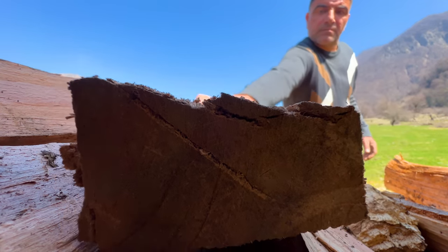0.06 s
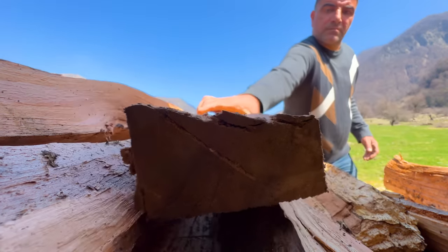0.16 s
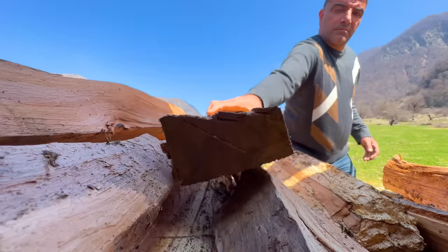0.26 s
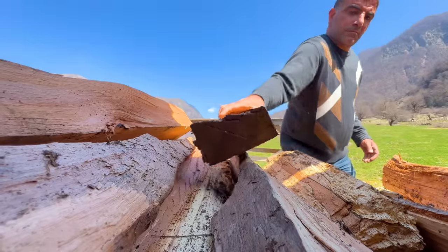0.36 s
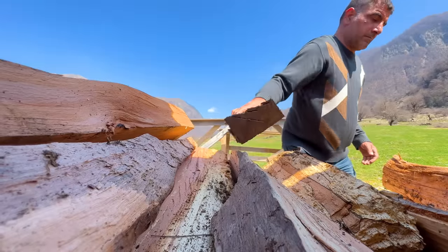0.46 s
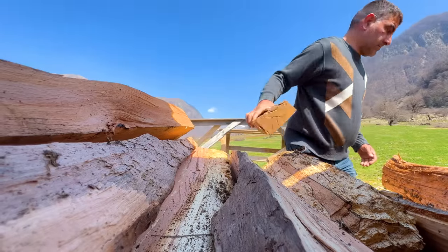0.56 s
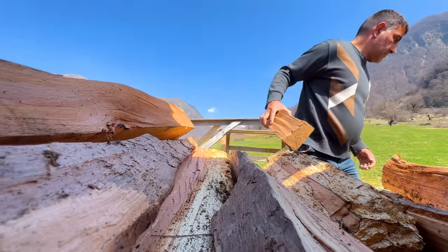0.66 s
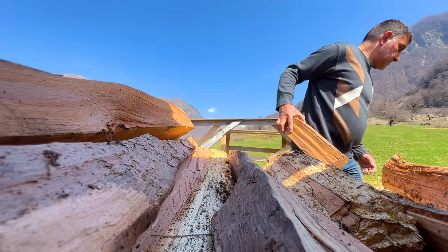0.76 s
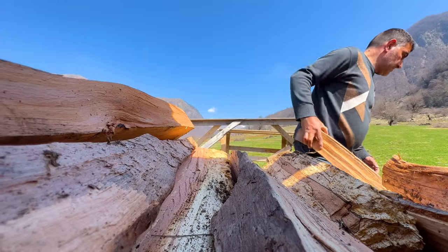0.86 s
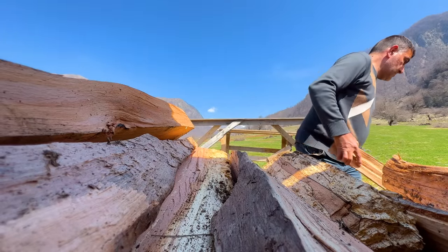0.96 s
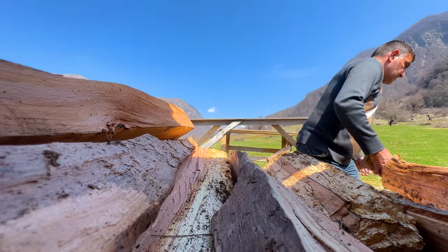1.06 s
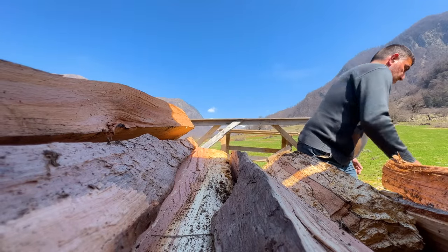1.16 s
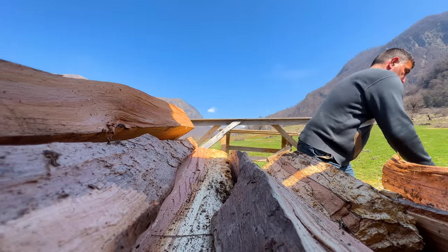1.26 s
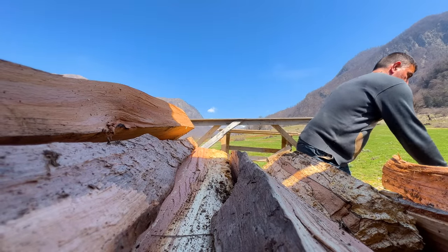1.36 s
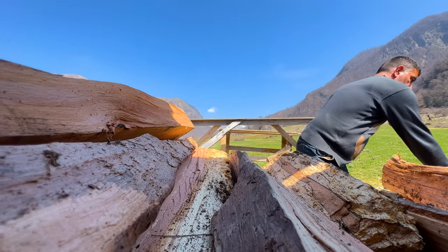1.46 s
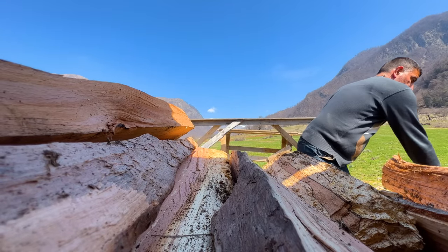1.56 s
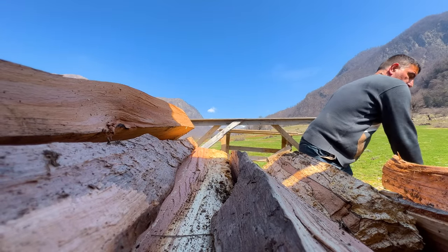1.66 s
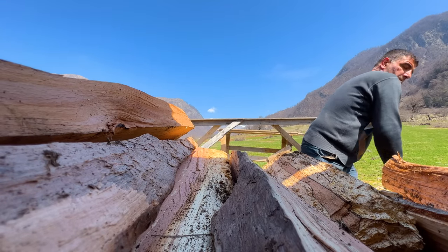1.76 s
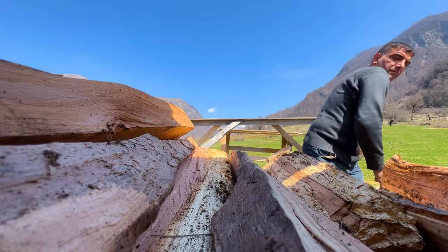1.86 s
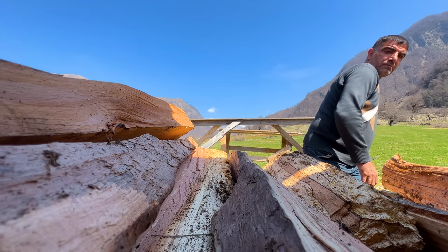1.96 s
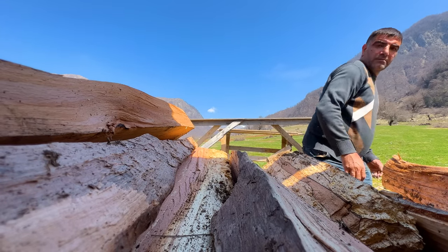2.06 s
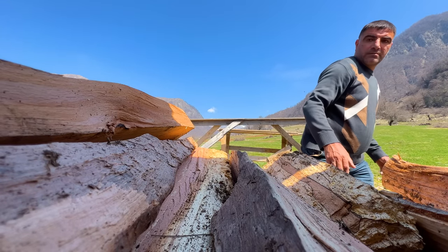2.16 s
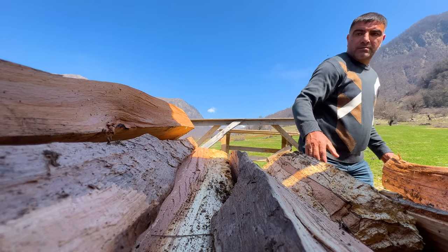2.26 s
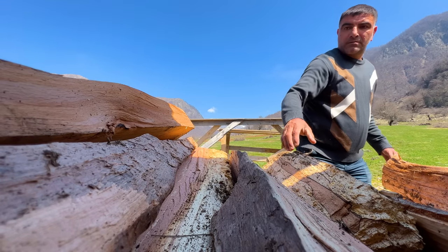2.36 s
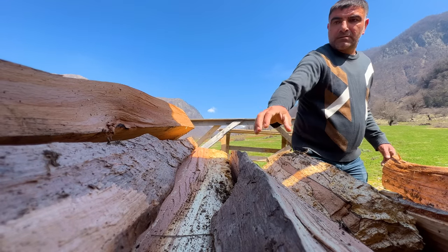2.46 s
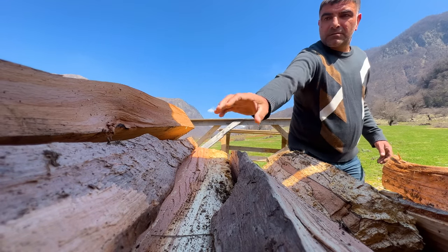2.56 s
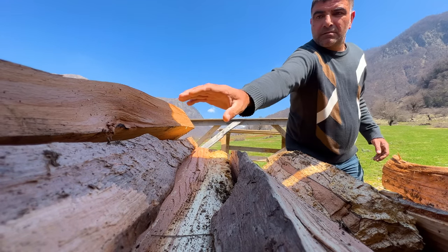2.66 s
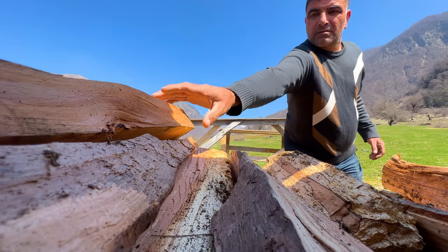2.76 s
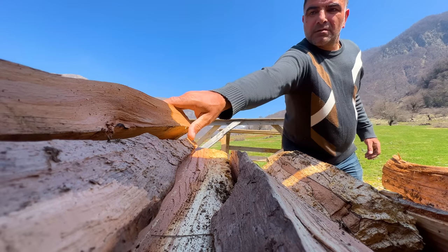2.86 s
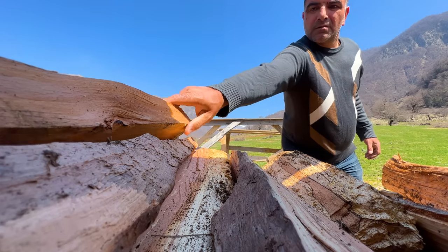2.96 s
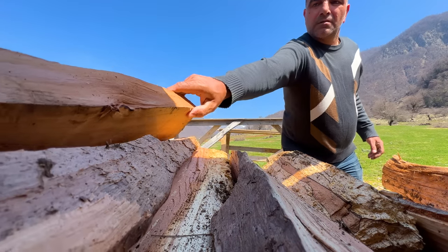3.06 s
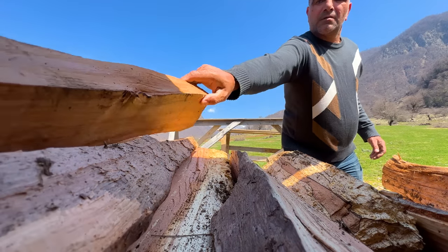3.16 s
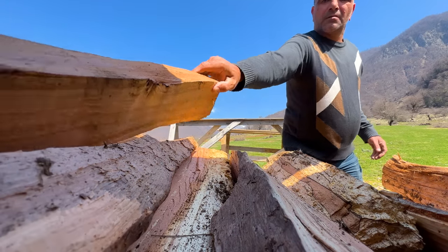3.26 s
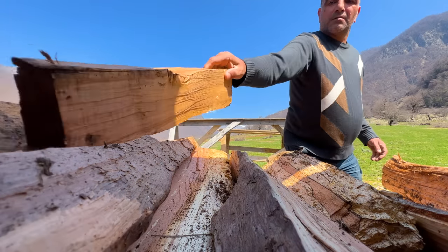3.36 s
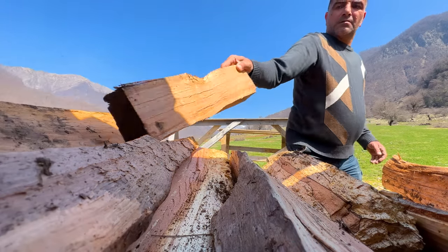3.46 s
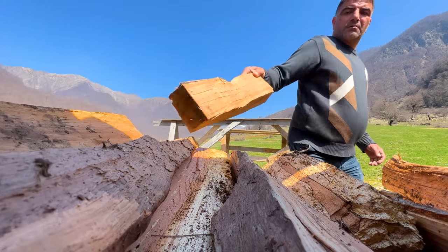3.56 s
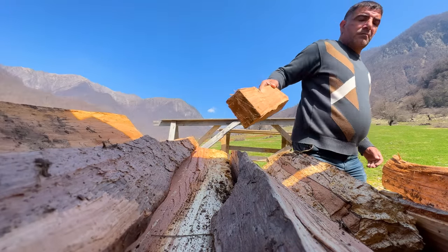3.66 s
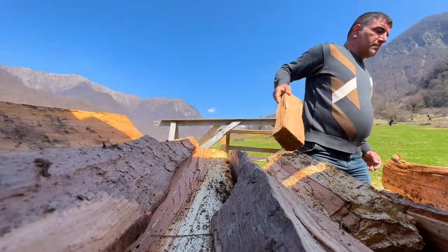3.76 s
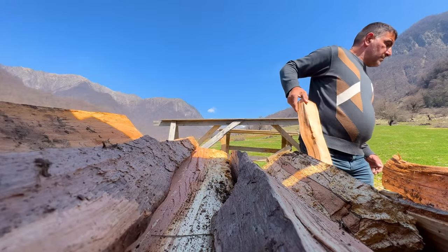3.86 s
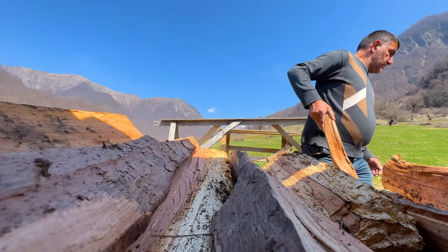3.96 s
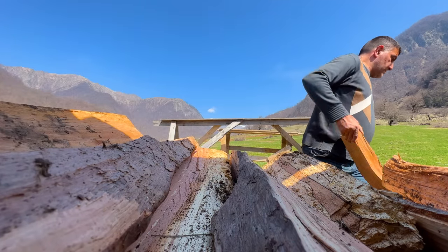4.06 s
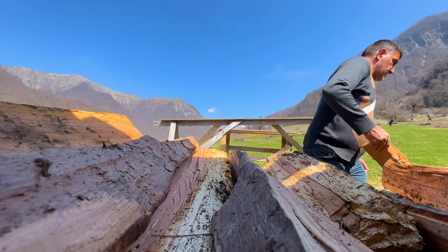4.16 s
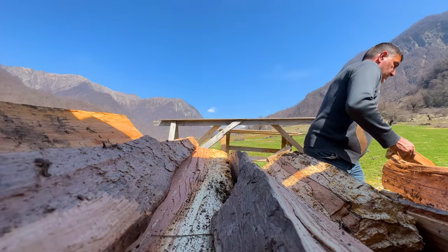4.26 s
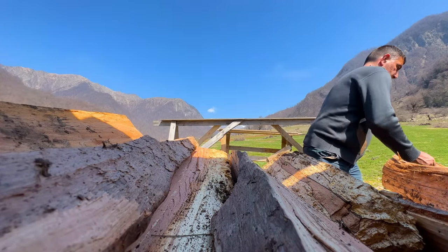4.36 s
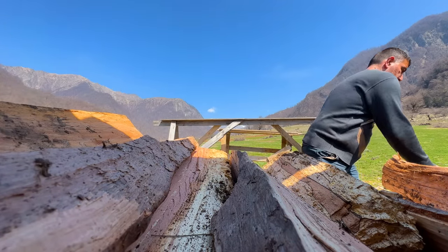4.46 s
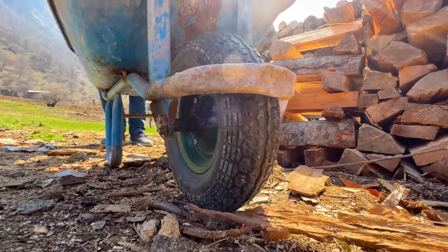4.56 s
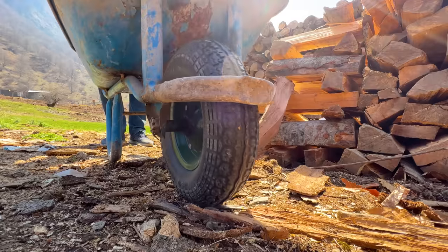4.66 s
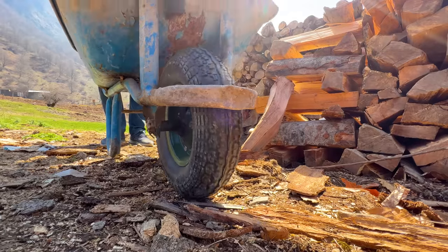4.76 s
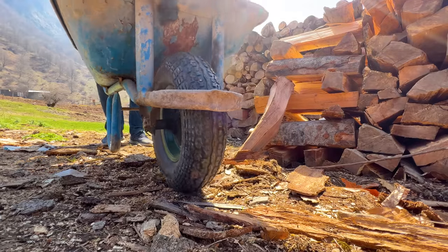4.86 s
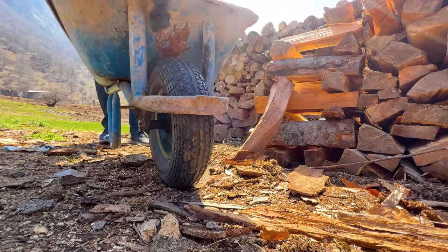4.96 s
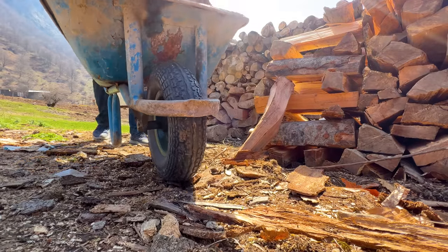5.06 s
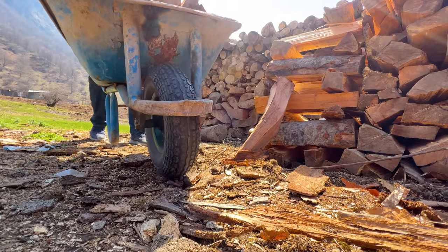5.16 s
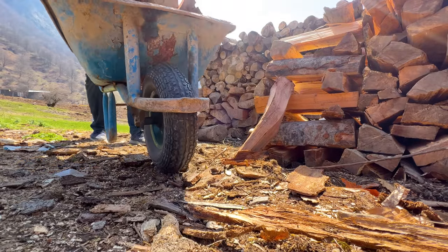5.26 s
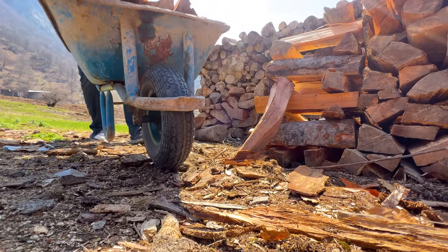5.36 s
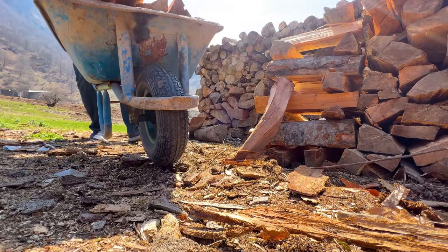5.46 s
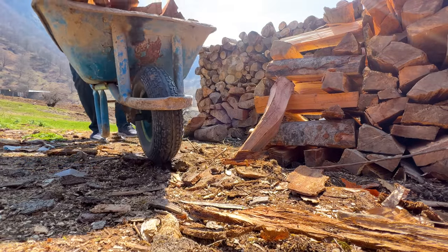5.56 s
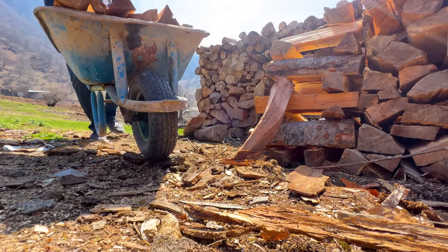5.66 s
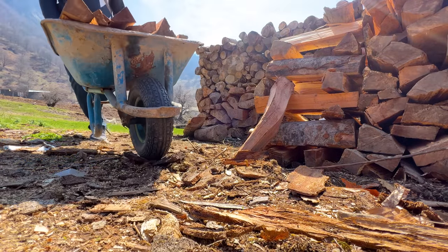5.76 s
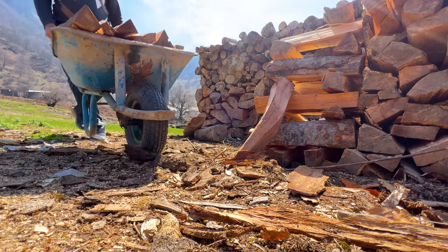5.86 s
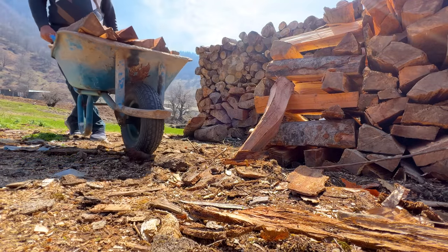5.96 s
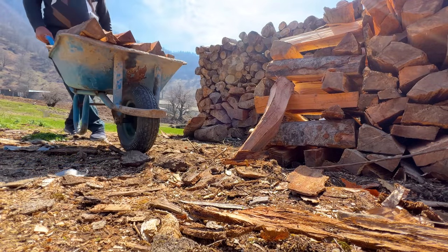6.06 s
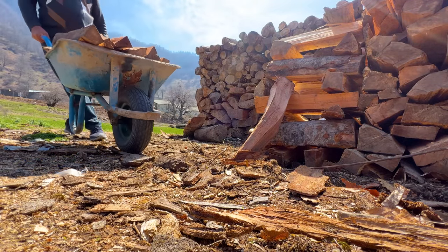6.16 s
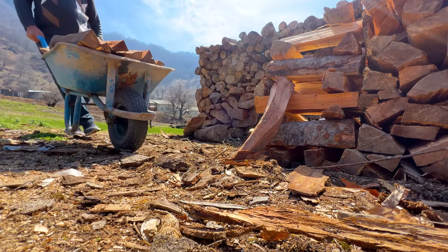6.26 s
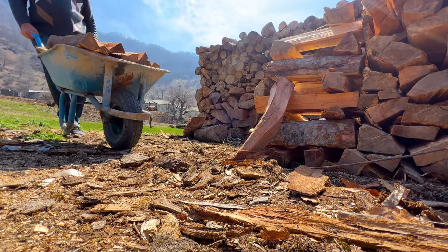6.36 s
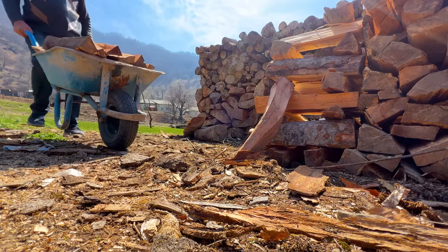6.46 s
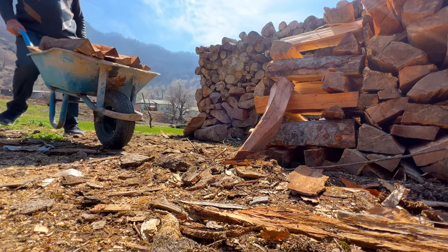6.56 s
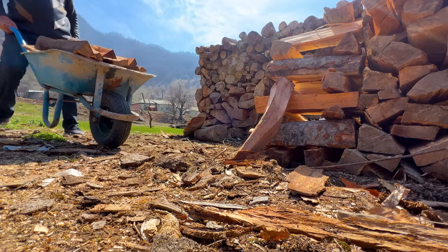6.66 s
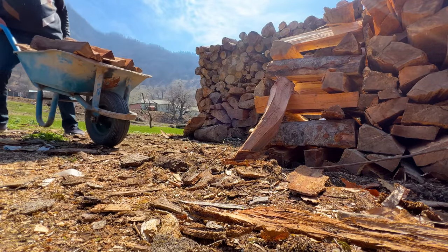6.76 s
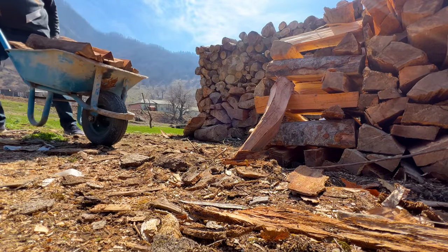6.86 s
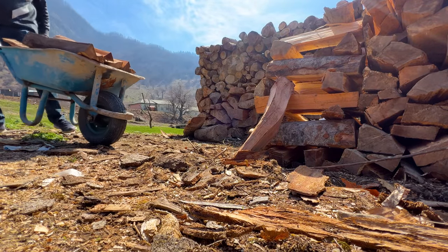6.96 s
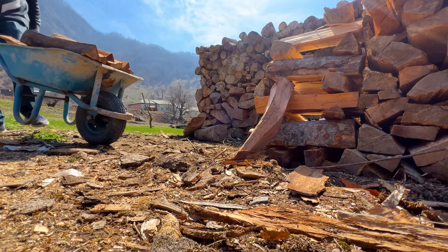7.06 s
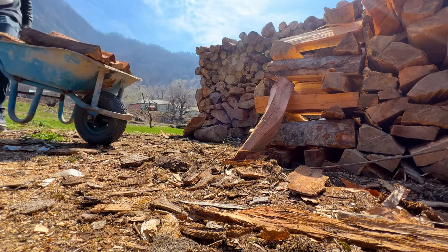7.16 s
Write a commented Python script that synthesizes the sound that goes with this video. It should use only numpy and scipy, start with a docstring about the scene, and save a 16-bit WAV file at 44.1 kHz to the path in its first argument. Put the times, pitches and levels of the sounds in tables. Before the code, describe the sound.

Close and dry outdoors, with very soft, low air noise throughout. From 0 to 0.4 s a split log is dragged off a loaded wheelbarrow: a brief resonant scrape, dull wood knocks, a bright clack and a low wobble of the tray on its tyre. Near-quiet follows, with a faint knock around 1.3 s. At 1.6 s the log lands on a woodpile with a loud hollow thump, a clonk and fast bounces dying by 1.8 s. Quiet again until 2.8 s, when a longer log grates and clacks until 3.55 s, hardest at 3.0 and 3.5 s, with low rocking. It thumps down at 4.62 s, bouncing briefly. From about 4.9 s the barrow rolls away over bark chips: hiss, snaps, low jolts and load knocks, strong at 5.4 s, with a sharp crunch at 5.75 s. Smaller crackles and soft rumbles recede to about 7.2 s as a faint distant watery rush rises.

```python
"""Split logs are dragged out of a steel wheelbarrow and land on a wood stack outdoors, with hollow thumps and bounces.
Sliding is rough noise that rings each log's resonances; blows and wood knocks are decaying tones with noise bursts.
The loaded tray rocks on its tyre as low tones. Then the barrow is pulled away over bark chips, its load knocking:
hiss, crunches and snaps are shaped noise, and the frame rumbles after bumps.
Low air noise, also shaped noise, lies under all; a far stream-like rush comes up in the later part."""
import sys
import numpy as np
from scipy import signal
from scipy.fft import rfft, irfft, next_fast_len
from scipy.io import wavfile
from scipy.ndimage import uniform_filter1d, map_coordinates

SR = 44100
rng = np.random.default_rng(int(sys.argv[2]) if len(sys.argv) > 2 else 0)


def dump(signal):
    """Clip the signal to [-1, 1] and save it as 16-bit WAV at the path in sys.argv[1]."""
    limited = np.clip(np.atleast_2d(signal).T, -1, 1)
    pcm = np.round(limited * 32767).astype(np.int16)
    wavfile.write(sys.argv[1], SR, pcm)


N = 317961
T = np.arange(N) / SR  # time in seconds

# Resonances of the log that moves first. Each row: pitch in Hz, basic width in Hz, relative level in dB.
SHORT_LOG_MODES = [(822, 21, -3), (1132.6, 9.1, 10), (1600, 72, -5.5), (1800, 28, -18), (2320, 36, -6.5),
                   (2820, 26, -7), (3620, 38, -15), (5000, 150, -37), (6300, 130, -26)]
# Resonances of the log that moves later. Each row: pitch in Hz, basic width in Hz, relative level in dB.
LONG_LOG_MODES = [(345, 75, 1), (477, 58, -3), (605, 130, -9.5), (782, 100, -8), (877, 71, -8),
                  (1004, 76, -0.5), (1164, 58, 3.5), (1237, 64, -11), (1590, 37, -9), (1792, 64, 0.5),
                  (2070, 29, -19), (2576, 46, -9.5), (2847, 54, -9), (3430, 82, -20), (3830, 41, -38),
                  (4640, 61, -24), (5175, 80, -17)]
# Tone colour of rasping wood. Each row: frequency in Hz, relative level in dB per Hz.
RASP_COLOUR = [(600, -14), (1500, -12), (3000, -14.5), (5000, -15.5), (6500, -18.5), (8700, -17),
               (11000, -22.5), (13000, -20), (15700, -27.5)]


def amp(db):
    """Turns a level in dB into a gain."""
    return 10 ** (np.asarray(db) / 20)


def unit(x):
    """Scales x to an rms of 1."""
    return x / np.sqrt(np.mean(x ** 2) + 1e-20)


def along(points, hz):
    """Reads a curve of (Hz, value) points on a log frequency axis."""
    f, v = np.transpose(points)
    return np.interp(np.log(hz + 1), np.log(f + 1), v)


def curves(tables):
    """Joins timed rows into one smooth curve per column, at -200 dB (silent) away from the tables."""
    out = np.full((len(tables[0][0]) - 1, N), -200.)
    for rows in tables:
        s, *columns = np.transpose(rows)
        inside = (T >= s[0]) & (T <= s[-1])
        out[:, inside] = [np.interp(T[inside], s, column) for column in columns]
    return uniform_filter1d(out, size=301)  # no step at the ends


def wobble(rate, size=N):
    """Draws a smooth random curve through a given number of random points a second."""
    points = rng.standard_normal(int(size * rate / SR) + 4)
    return map_coordinates(points, [T[:size] * rate])


def filtered(x, response):
    """Multiplies the spectrum of x by a response to frequency, which may be complex."""
    m = next_fast_len(len(x) + SR // 4)
    return irfft(rfft(x, m) * response(np.fft.rfftfreq(m, 1 / SR)), m)[:len(x)]


def coloured(x, spectrum):
    """Gives x a tone colour from (Hz, dB) points, at rms 1."""
    return unit(filtered(x, lambda hz: amp(along(spectrum, hz))))


def bump(centre_hz, octaves):
    """Makes a response that favours a region around one frequency."""
    return lambda hz: np.exp(-(np.log2((hz + 1) / centre_hz) / octaves) ** 2)


def ring(hz, t60, attack, t):
    """A sine that starts softly and dies by 60 dB in t60 seconds."""
    return np.sin(2 * np.pi * hz * t) * amp(-60 * t / t60) * (1 - np.exp(-t / attack))


def gritty(spiky_db, lumps_db):
    """Noise of grains with uneven sizes that come in clumps."""
    return rng.standard_normal(N) * amp(spiky_db * wobble(900) + lumps_db * wobble(60))


def add(x, s, sound):
    """Mixes a sound into x from second s."""
    part = x[round(s * SR):][:len(sound)]
    part += sound[:len(part)]


def air():
    """Outdoor air: low noise, nearly steady but a little gusty."""
    # Tone colour of the air. Each row: frequency in Hz, relative level in dB per Hz.
    air_colour = [(15, -34.5), (25, -37.5), (64, 0), (104, -2.5), (160, -6), (290, -13), (332, -15.5),
                  (370, -15.5), (726, -31.5), (1210, -27), (1390, -31), (2020, -19.5), (3030, -47.5),
                  (9140, -50), (15700, -83)]
    level_db = -59.5 + 0.15 * wobble(4.3)
    return amp(level_db) * coloured(gritty(spiky_db=1, lumps_db=0.55), air_colour)


def far_rush():
    """A far stream-like rush: noise gathered near 2 kHz that swells in the later part."""
    # Swell of the rush. Each row: time in seconds, level in dB.
    rush_levels = [(4.6, -96.5), (5.14, -71), (5.6, -72.5), (5.9, -68.5), (7.21, -66)]
    rush_db, = curves([rush_levels])
    colour = [(800, -27.0), (1500, -15.0), (1900, 0.0), (2500, -11.5), (3200, -43.5), (6000, -50)]
    return amp(rush_db) * coloured(rng.standard_normal(N), colour)


def tyre_on_chips():
    """The tyre hisses over the chips as clumpy noise; small splinters ring briefly and follow its level."""
    # Tyre hiss. Each row: time in seconds, level in dB.
    tyre_levels = [(4.64, -72), (4.9, -72), (5.12, -70), (5.25, -75.5), (5.45, -67), (5.65, -73.5),
                   (5.78, -61), (6.1, -70), (6.5, -75), (7.21, -76.5)]
    # Tone colour of the hiss. Each row: frequency in Hz, relative level in dB per Hz.
    hiss_colour = [(500, -22), (1000, 1.5), (1400, 1), (2000, -7.5), (3200, -12), (4600, -8.5),
                   (5600, -14.5), (9000, -14), (12000, -19), (15700, -17.5)]
    hiss_db, = curves([tyre_levels])
    hiss = amp(hiss_db) * coloured(gritty(spiky_db=2.0, lumps_db=2.5), hiss_colour)

    splinters, t = np.zeros(N), T[:SR // 10]
    when, size, pitch = rng.random((260, 3)).T  # 260 splinters
    start = tyre_levels[0][0]
    times = start + when * (T[-1] - start)
    levels_db = -56.5 - 6 * np.sqrt(size)  # before following the hiss
    pitches_hz = 500 * 2 ** (3 * pitch)  # spread over three octaves
    for s, db, hz in zip(times, levels_db, pitches_hz):
        follow_db = hiss_db[round(s * SR)] - hiss_db.max()
        add(splinters, s, amp(db + follow_db) * ring(hz, 8 / hz, 0.00015, t))  # dies within 8 cycles
    return hiss + splinters


def crushed_chips():
    """Chips crushed under shoe or tyre: bursts of gritty noise, each with its own treble balance."""
    # Tone colour of crushing. Each row: frequency in Hz, relative level in dB per Hz.
    crunch_colour = [(290, -13), (600, -4), (1200, -10), (3000, -15), (5000, -11.5), (8000, -19),
                     (12000, -23), (15700, -27.5)]
    # Crushes. Each row: start in seconds, rise in seconds, time to die by 60 dB in seconds, level in dB,
    # treble tilt in dB per octave, bright band in Hz, lift of that band in dB.
    crushes = [(5.038, 0.011, 0.23, -54.5, -5, 1210, 5.5), (5.151, 0.0075, 0.14, -55, -4.5, 5000, 5),
               (5.178, 0.0059, 0.3, -62, -10, 4950, 2), (5.3, 0.11, 0.6, -81.5, -10, 1360, 23),
               (5.745, 0.018, 0.11, -34.5, -1, 4900, 4.5), (5.85, 0.0046, 0.073, -69.5, 7, 5000, 8),
               (5.93, .01, 0.054, -72, -7, 3800, 15), (5.964, .003, 0.29, -64.5, 7, 3600, 9),
               (6.04, 0.0031, 0.04, -68, 9.5, 5000, 0), (6.16, 0.0099, 0.45, -68, 0, 2730, 14),
               (6.235, 0.0033, 0.085, -65.5, 8.5, 4500, -3), (6.349, 0.0048, 0.063, -68, 0, 4250, 8),
               (6.483, .003, 0.079, -63.5, 6.5, 5000, 2), (6.606, 0.0042, 0.055, -51, 1.5, 5600, 1),
               (6.748, 0.0043, 0.079, -67.5, -7, 5000, 3), (6.82, 0.011, 0.16, -83, 7, 5000, -3)]
    chips = coloured(gritty(spiky_db=3.5, lumps_db=2), crunch_colour)
    out = np.zeros(N)
    for s, rise, t60, db, tilt_db, bright_hz, bright_db in crushes:
        under = chips[round(s * SR):][:SR // 2]
        t = T[:len(under)]
        crush = amp(db - 60 * np.maximum(t - rise, 0) / t60) * np.minimum(t / rise, 1) * under
        bright_band = bump(bright_hz, octaves=.2)
        add(out, s, filtered(crush, lambda hz: amp(
            tilt_db * np.log2((hz + 500) / 4000) + bright_db * bright_band(hz))))
    return out


def snapping_chips():
    """A breaking chip gives a very short burst of noise and a quickly dying pop."""
    # Snaps. Each row: start in seconds, snap level in dB, pop level in dB, pop pitch in Hz.
    chip_snaps = [(5.045, -44, -44, 1230), (5.157, -59, -41, 736), (5.183, -67, -50, 4770),
                  (5.215, -64, -43, 760), (5.295, -65, -47, 950), (5.369, -76, -53, 1340),
                  (5.433, -70, -50, 872), (5.455, -56, -48, 800), (5.483, -45, -51, 1390),
                  (5.501, -51, -51, 1410), (5.536, -76, -48, 1030), (5.7, -56, -42, 990),
                  (5.85, -49, -65, 1080), (5.872, -65, -41.5, 1080), (5.879, -66, -46, 1090),
                  (5.965, -59, -58, 746), (5.969, -62, -52.5, 3630), (5.984, -65, -44, 635),
                  (5.997, -56, -56, 1210), (6.172, -55, -70, 1010), (6.219, -68, -46, 840),
                  (6.236, -49.5, -50, 1100), (6.352, -66, -55, 1400), (6.484, -49, -59, 1190),
                  (6.608, -50.5, -43.5, 1080), (6.61, -70, -44.5, 5600), (6.705, -66.5, -74, 1000),
                  (6.772, -65, -62, 1000), (6.829, -58, -63, 1000), (6.851, -53, -55, 1060)]
    snaps, pops, t = np.zeros(N), np.zeros(N), T[:SR // 10]
    for s, snap_db, pop_db, hz in chip_snaps:
        add(snaps, s, amp(snap_db - 60 * t / 0.0032) * rng.standard_normal(len(t)))
        add(pops, s, amp(pop_db) * ring(hz, 0.016, 0.000048, t))
    return pops + filtered(snaps, lambda hz: hz ** 2 / (hz ** 2 + 800 ** 2))  # less bass in the snaps


def jolted_frame():
    """Bumps jolt the wheel and shake the frame: low noise that swells, then dies to a faint rumble."""
    # Bumps under the wheel. Each row: start in seconds, level in dB.
    bumps = [(4.86, -47.5), (5.043, -38), (5.15, -42.5), (5.19, -51), (5.399, -39), (5.754, -38),
             (5.95, -50), (6.13, -49.5), (6.342, -48.5), (6.6, -54.5), (6.76, -49), (7.0, -83)]
    rise_s, t60_s, between_db = 0.0326, 0.46, -63
    shake, t = amp(between_db) * (T > bumps[0][0]), T[:SR]
    for s, db in bumps:
        add(shake, s, amp(db - 60 * t / t60_s) * np.minimum(t / rise_s, 1))
    colour = [(30, -44.0), (80, 4.0), (250, 2.5), (500, -11), (900, -25.5), (3000, -49.0)]
    return shake * coloured(gritty(spiky_db=1.5, lumps_db=3.5), colour)


def rocking():
    """After each push the loaded tray bounces on its tyre, as one low tone that dies away."""
    # Pushes on the tray. Each row: start in seconds, level in dB, pitch in Hz.
    pushes = [(0.0, -41.5, 60), (0.121, -35, 55), (0.149, -27.5, 57.4), (0.242, -28, 48.8),
              (0.286, -39.5, 48.3), (0.373, -30, 46.5), (2.848, -41.5, 50), (2.891, -38, 47),
              (2.992, -28, 52), (3.03, -28, 49.8), (3.14, -32, 47.8), (3.22, -35, 48.2), (3.32, -43, 49),
              (3.479, -27.5, 50.2), (3.549, -29, 50), (3.641, -45, 46.6)]
    rise_s, t60_s = 0.013, 0.39
    out = np.zeros(N)
    for s, db, hz in pushes:
        add(out, s, amp(db) * ring(hz, t60_s, rise_s, T[:SR // 2]))
    return out


def knocks():
    """Dull wood on wood: a few cycles of one low tone, with a brief woody puff of noise."""
    # Knocks. Each row: start in seconds, level in dB, pitch in Hz, time to die by 60 dB in seconds.
    wood_knocks = [(0.105, -27, 183, 0.043), (0.143, -19, 241, 0.038), (.158, -38, 260, 0.042),
                   (.18, -39, 248, .05), (0.212, -42, 218, 0.065), (0.246, -30, 225, 0.063),
                   (.32, -42, 325, 0.031), (0.364, -32, 192, 0.056), (1.273, -42, 197, 0.17),
                   (1.389, -51, 453, 0.064), (1.433, -50, 635, 0.05), (2.331, -39, 163, 0.052),
                   (2.795, -44.5, 236, 0.065), (2.841, -39, 197, 0.076), (2.963, -34.5, 240, 0.077),
                   (3.017, -28.5, 183, 0.062), (3.039, -35, 253, 0.052), (3.398, -26.5, 152, 0.031),
                   (3.478, -16.5, 189, 0.029), (3.487, -18.5, 298, 0.021), (3.508, -16, 143, 0.025),
                   (3.52, -32, 180, 0.022), (3.537, -34.5, 199, 0.043), (4.363, -46.5, 172, 0.086),
                   (4.922, -30, 272, 0.069), (5.048, -38.5, 470, 0.1), (5.093, -27, 195, 0.029),
                   (5.156, -33.5, 463, 0.045), (5.193, -31.5, 254, 0.058), (5.226, -42, 262, 0.086),
                   (5.411, -22.5, 262, 0.025), (5.435, -34, 202, 0.058), (5.452, -44, 403, 0.058),
                   (5.634, -45.5, 378, 0.043), (5.756, -33.5, 140, 0.069), (5.768, -27, 320, 0.041),
                   (5.79, -30, 378, 0.046), (5.812, -43, 357, 0.17), (5.849, -41, 127, 0.2),
                   (5.978, -48, 305, 0.021), (6.133, -42, 219, 0.095), (6.34, -41, 209, 0.1),
                   (6.398, -38, 316, 0.066), (6.412, -37, 376, 0.049), (6.607, -37.5, 130, 0.09),
                   (6.664, -34, 174, 0.088), (6.788, -40.5, 178, 0.086)]
    puff_db, puff_t60_s = -10.5, 0.09  # puff level is relative to its knock
    out, puffs, t = np.zeros(N), np.zeros(N), T[:SR // 4]
    for s, db, hz, t60 in wood_knocks:
        add(out, s, amp(db) * ring(hz, t60, 0.0023, t))
        puff = amp(db + puff_db - 60 * t / puff_t60_s) * (1 - np.exp(-t / 0.0071))
        add(puffs, s, puff * rng.standard_normal(len(t)))
    return out + filtered(puffs, bump(457, octaves=1.0))


def clacks():
    """A free log clacks on its neighbours: its modes ring, most near a favoured pitch, with a noisy click."""
    # Clacks. Each row: start in seconds, tone level in dB, click level in dB, favoured pitch in Hz
    # (set by the spot that is struck).
    log_clacks = [(.1, -50, -63, 1190), (0.145, -51, -54, 1100), (0.151, -63, -64, 1590),
                  (0.159, -59, -63.5, 3000), (.183, -48.5, -51, 1500), (0.235, -59, -58.5, 2010),
                  (0.245, -50, -64, 4500), (.318, -38, -34.5, 1480), (0.339, -52, -51.5, 1330),
                  (0.36, -59, -56.5, 1370), (2.84, -45.5, -67, 547), (2.868, -64, -73, 895),
                  (2.98, -29, -54, 1450), (3.007, -17, -38, 650), (3.112, -48, -78, 1410),
                  (3.256, -51, -78, 1780), (3.294, -46.5, -63, 2600), (3.369, -40, -61, 2080),
                  (3.384, -40, -58, 2130), (3.399, -44, -60, 1230), (3.4771, -26.5, -52, 1440),
                  (3.473, -36.5, -58, 2960), (3.485, -31, -55, 1070), (3.507, -32.5, -59, 815),
                  (3.503, -43, -60, 1850), (3.505, -44, -60, 4630)]
    favoured_octaves, level_share, longest_t60_s = 0.61, 0.3, 0.112  # share: how far mode levels count
    clicks, tones, t = np.zeros(N), np.zeros(N), T[:SR // 8]
    for s, db, click_db, favoured_hz in log_clacks:
        click = amp(click_db - 60 * t / 0.021) * (1 - np.exp(-t / 0.0016))
        add(clicks, s, click * rng.standard_normal(len(t)))
        favour = bump(favoured_hz, favoured_octaves)
        tone = np.zeros(len(t))
        for hz, width, mode_db in SHORT_LOG_MODES if s < 1.5 else LONG_LOG_MODES:
            t60 = min(1.46 / width, longest_t60_s)  # broad modes die sooner
            tone += amp(level_share * mode_db) * favour(hz) * ring(hz, t60, 0.00034, t)
        add(tones, s, amp(db) * tone)
    return tones + filtered(clicks, lambda hz: amp(along(RASP_COLOUR, hz) + 13.0))


def sing(force, modes, drift_db):
    """Rubbing rings a log's modes, each fading in and out as the contact travels along it."""
    widen, lift_db = 1.43, 2
    total = np.zeros(len(force))
    for centre, width, db in modes:
        broad = width * widen

        def resonance(hz):
            once = 1j * hz * broad / (centre ** 2 - hz ** 2 + 1j * hz * broad)
            return amp(db + lift_db) * once ** 2  # two in a row leave dark valleys between modes

        total += filtered(force * amp(drift_db * wobble(26.6, len(force))), resonance)
    return total


def sliding_logs():
    """Rough contact rings the sliding log; rasp and rumble sound directly, and catching bark adds scrapes."""
    # Slides, as a list of tables. Each row: time in seconds, push into the log in dB, rasp level in dB,
    # rumble level in dB.
    slides = [
        [(0.0, -54, -74.5, -59.5), (0.09, -42, -66, -49), (.17, -43, -63, -42.5), (0.236, -51.5, -81, -49.5),
         (0.31, -62, -86, -47)],
        [(2.88, -64.5, -86, -53), (2.94, -48, -59.5, -62.5), (3.022, -29, -66, -36), (3.07, -43.5, -83, -50),
         (3.12, -37, -68, -48), (3.18, -38.5, -63, -47.5), (3.225, -40, -67, -51), (3.28, -39.5, -68, -46),
         (3.342, -37, -64, -43), (3.386, -57, -72, -43), (3.47, -73, -69, -53)],
    ]
    # Short harsh scrapes as bark catches. Each row: start in seconds, hold in seconds, push in dB,
    # rasp level in dB, favoured pitch in Hz (set by the place of grip).
    scrapes = [(0.039, 0.0074, -49, -64, 1510), (0.15, 0.019, -35, -52, 2000),
               (0.17, 0.031, -35, -60.5, 2400), (0.229, 0.018, -32.5, -54.5, 2600),
               (2.839, 0.026, -44, -57.5, 1510), (2.951, 0.039, -42, -55.5, 1200),
               (2.978, 0.023, -20, -46, 2140), (3.01, 0.0081, -18, -62, 814),
               (3.014, 0.0039, -16, -50, 3000), (3.03, 0.013, -38, -56.5, 3500),
               (3.178, 0.008, -51, -83, 1800), (3.184, 0.0028, -60, -54.5, 5000),
               (3.409, 0.0095, -46, -63, 1500), (3.364, 0.03, -31.5, -52, 1190),
               (3.469, 0.0033, -35, -41.5, 1600), (3.497, 0.01, -25, -51, 990)]
    push_db, rasp_db, rumble_db = curves(slides)
    grit = unit(gritty(spiky_db=2.5, lumps_db=1.3))
    force, tear = amp(push_db) * grit, amp(rasp_db)
    t = T[:SR // 8]
    for s, hold, scrape_push_db, scrape_rasp_db, favoured_hz in scrapes:
        # sudden grip, short hold, release
        catch = (1 - np.exp(-t / 0.0021)) * amp(-60 * np.maximum(t - hold, 0) / 0.045)
        rub = filtered(catch * rng.standard_normal(len(t)), bump(favoured_hz, octaves=1.0))
        add(force, s, amp(scrape_push_db) * rub)
        add(tear, s, amp(scrape_rasp_db) * catch)
    ringing = np.zeros(N)
    add(ringing, 0, sing(force[:SR], SHORT_LOG_MODES, drift_db=3))
    add(ringing, 2, sing(force[2 * SR:4 * SR], LONG_LOG_MODES, drift_db=.8))
    rasp = tear * coloured(grit, RASP_COLOUR)
    rumble_colour = [(40, -7.0), (90, 6.0), (330, -3.5), (600, -33.0), (2000, -56.5)]
    rumble = amp(rumble_db) * coloured(gritty(spiky_db=-1, lumps_db=2.0), rumble_colour)
    return ringing + rasp + rumble


def loose_bark(t):
    """Loose bark rattles: noise that dies at a different speed in each frequency band."""
    # Bark bands. Each row: frequency in Hz, relative level in dB, time to die by 60 dB in seconds.
    bark_bands = [(303, 13.5, 0.72), (540, 24, 0.25), (1050, 1.5, 0.52), (1960, -1.5, 0.31),
                  (3740, -14, 0.25), (8100, -19, 0.12), (14000, -32.5, .08)]
    f, level, t60 = np.transpose(bark_bands)
    bins, frames, z = signal.stft(rng.standard_normal(len(t)), SR, nperseg=256)
    start_db = along(np.c_[f, level], bins)[:, None]
    fall_db = 60 * frames / along(np.c_[f, t60], bins)[:, None]
    bark = signal.istft(z * amp(start_db - fall_db), SR, nperseg=256)[1][:len(t)]
    return bark * (1 - np.exp(-t / 0.0015))


def stack_ring(s, t):
    """A blow rings the fixed modes of the stack, plus weak modes of its many logs, new at each blow."""
    # Modes of the stack. Each row: pitch in Hz, relative level in dB at the first landing place,
    # relative level in dB at the second, time to die by 60 dB in seconds.
    stack_modes = [(99.6, -7, -9, 0.28), (156.2, -3, -4.5, 0.3), (241.6, -1, -3, 0.36), (308, 1, 3.5, 0.3),
                   (345.5, 0.5, 1.5, 0.34), (434, -7.5, -5.5, 0.95), (459.3, -6.5, -17, 0.67),
                   (495, 0.5, -5.5, 0.3), (596, -11.5, -3, 0.22), (658, -1.5, -10, 0.41),
                   (700, -6.5, -5, 0.17), (747, -16, -19.5, 0.23), (849, -18, -22, 0.19),
                   (906, -16.5, -12, 0.38), (985, -11.5, -17, 0.48), (1080, -17, -22, 0.32),
                   (1140, -17.5, -15.5, 0.18), (1195, -14, -13, 0.28), (1262, -16.5, -15.5, 0.18),
                   (1380, -20.5, -15.5, 0.29), (1950, -20.5, -23, 0.36)]
    out = np.zeros(len(t))
    for hz, first_db, second_db, t60 in stack_modes:
        db = first_db if s < 3 else second_db
        out += amp(db - 60 * t / t60) * np.sin(2 * np.pi * hz * (s + t))  # bounces feed a ring in step
    out *= 1 - np.exp(-t / 0.0039)
    lowest_hz, minor_db, cycles = 327, -11.5, 120
    for hz in lowest_hz * 2 ** (3 * rng.random(30)):  # 30 weak modes over three octaves
        strength = amp(minor_db) * lowest_hz / hz * rng.normal()
        add(out, 0, strength * ring(hz, cycles / hz, 0.003, t[:SR // 3]))
    return out


def landings():
    """A landing log thumps hollowly, shakes ground and stack; its edge gives a clonk, dry crack and bark."""
    # Landings and bounces. Each row: start in seconds, thump level in dB, hollow pitch in Hz,
    # time pressed on in seconds, time for the thump to die by 60 dB in seconds, edge level in dB,
    # clonk pitch in Hz, level of the stack's ring in dB.
    blows = [(1.585, -40, 291, .003, 0.044, -45, 896, -64),
             (1.5922, -13, 290.3, 0.0052, 0.098, -32.5, 950, -42),
             (1.61, -14, 273.7, 0.0048, 0.12, -15.5, 940, -39),
             (1.629, -12, 255.5, 0.016, 0.038, -29.5, 654, -45),
             (1.666, -23.5, 219, 0.0074, 0.059, -24, 680, -54),
             (1.703, -29, 235, 0.0052, 0.053, -35.5, 700, -62.5),
             (1.744, -37.5, 260, 0.0037, 0.11, -43.5, 970, -65),
             (4.617, -40, 295, 0.0017, 0.041, -35.5, 646, -57),
             (4.6237, -9.5, 286, 0.0027, 0.051, -16.5, 590, -41),
             (4.647, -14, 258.6, .01, 0.092, -22, 904, -37),
             (4.674, -20.5, 237, 0.0032, 0.11, -33.5, 1010, -51.5),
             (4.699, -26.5, 246, 0.013, 0.079, -35, 1207, -59.5),
             (4.734, -32, 274, .003, 0.15, -48, 850, -70), (4.771, -45.5, 264, 0.0069, 0.24, -48, 850, -66)]
    ground_db, ground_hz = -22, 47.7  # level relative to the thump
    bark_db, split_db = -17.5, -20  # bark and dry crack relative to the edge
    out, cracks, t = np.zeros(N), np.zeros(N), T[:SR * 3 // 4]
    for s, db, hz, hold, t60, edge_db, clonk_hz, ring_db in blows:
        modes = stack_ring(s, t)
        # the thump holds while the log presses on, then dies
        press = (1 - np.exp(-(t / 0.0022) ** 2)) * amp(-60 * np.maximum(t - hold, 0) / t60)
        thump = press * np.sin(2 * np.pi * hz * t)
        ground = amp(ground_db) * ring(ground_hz, 0.066, 0.0045, t)
        edge = ring(clonk_hz, 0.037, 0.0019, t) + amp(bark_db) * loose_bark(t)
        add(out, s, amp(db) * (thump + ground) + amp(ring_db) * modes + amp(edge_db) * edge)
        add(cracks, s, amp(edge_db + split_db - 60 * t / 0.039) * rng.standard_normal(len(t)))
    return out + filtered(cracks, bump(1900, octaves=1.0))


def scene():
    """Adds all sources at one microphone."""
    background = air() + far_rush()
    rolling = tyre_on_chips() + crushed_chips() + snapping_chips() + jolted_frame()
    wood = knocks() + clacks() + sliding_logs() + landings()
    return (background + rolling + rocking() + wood)[None]


def record(dry):
    """The microphone's case notches the treble; nothing is kept above the band limit."""
    # Dips from the case. Each row: centre in Hz, half-width in Hz, depth from 0 to 1.
    case_dips = [(5360, 143, 0.63), (7600, 310, 0.58), (10710, 760, 0.71)]
    band_limit_hz = 15810

    def response(hz):
        gain = (hz < band_limit_hz).astype(float)
        for centre, width, depth in case_dips:
            gain *= 1 - depth * np.exp(-((hz - centre) / width) ** 2)
        return gain

    return filtered(dry[0], response)[None]


dry = scene()
out = record(dry)
dump(out)
```